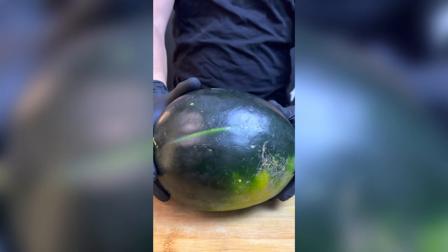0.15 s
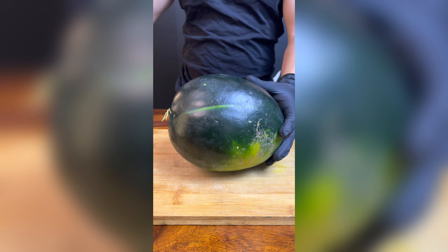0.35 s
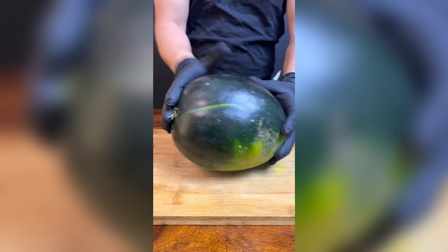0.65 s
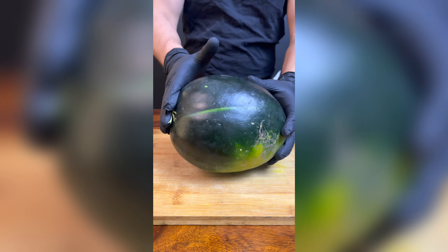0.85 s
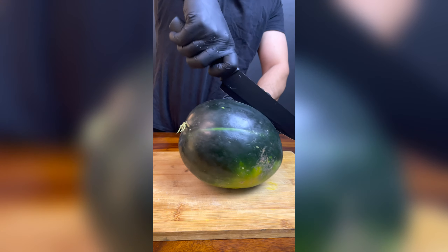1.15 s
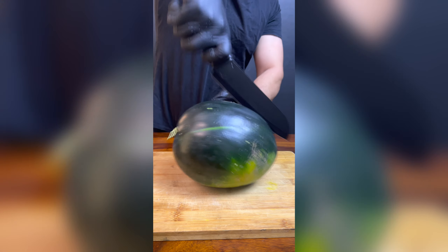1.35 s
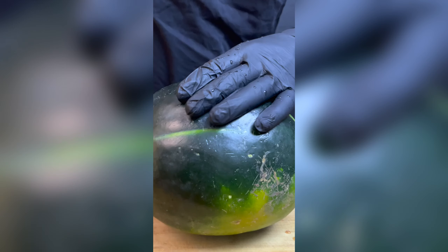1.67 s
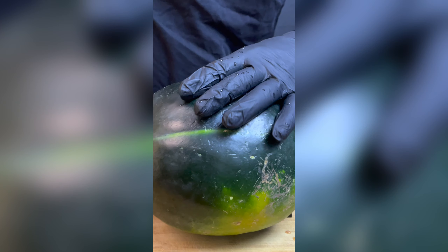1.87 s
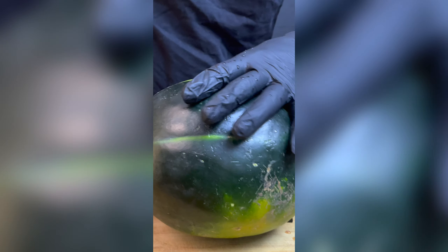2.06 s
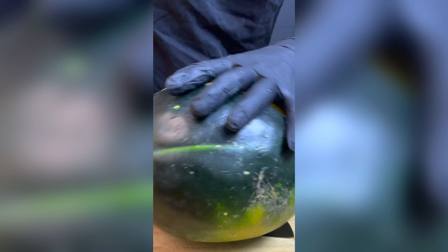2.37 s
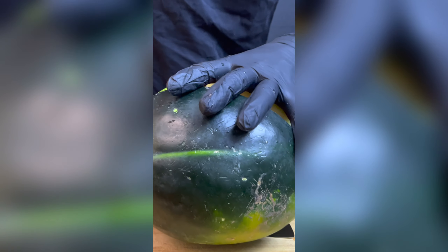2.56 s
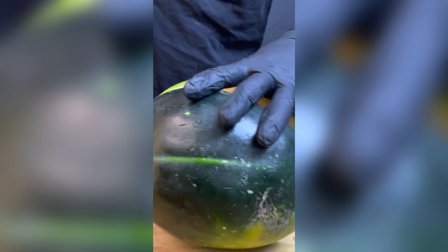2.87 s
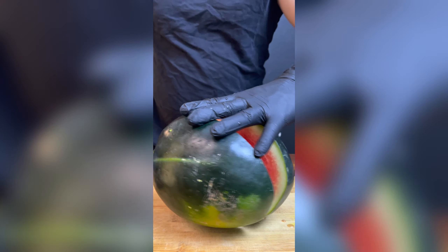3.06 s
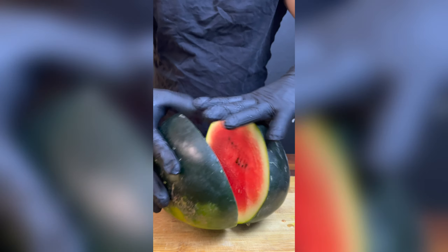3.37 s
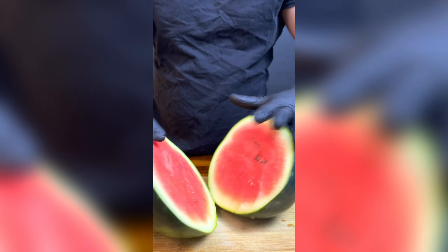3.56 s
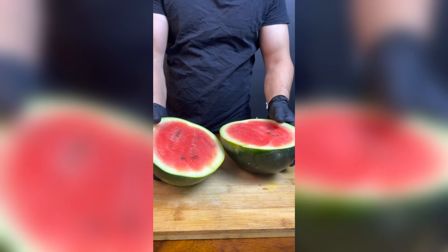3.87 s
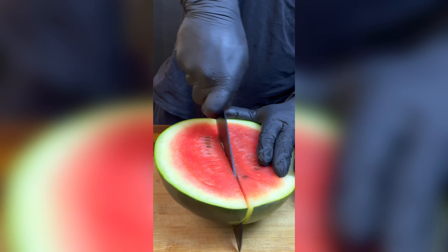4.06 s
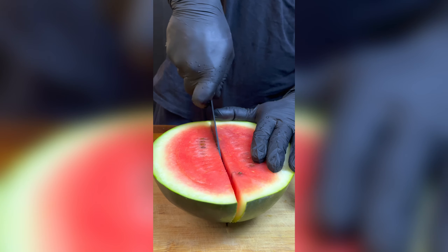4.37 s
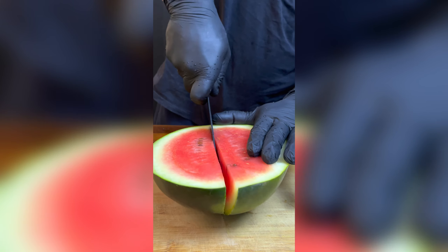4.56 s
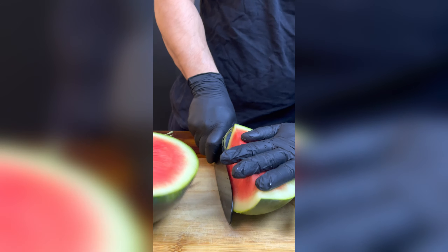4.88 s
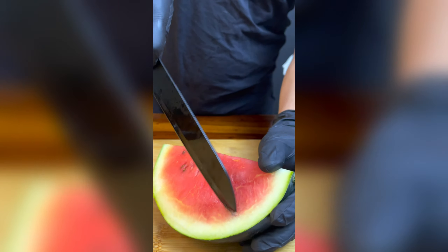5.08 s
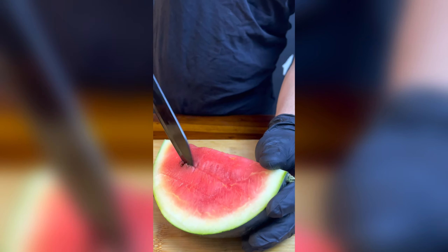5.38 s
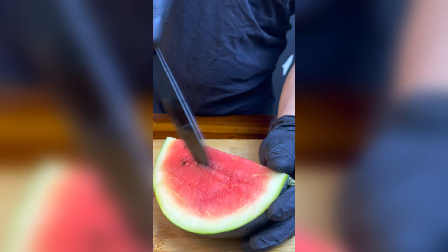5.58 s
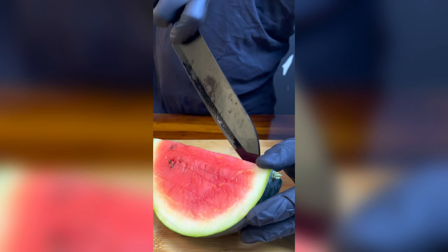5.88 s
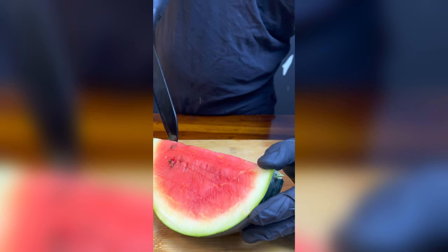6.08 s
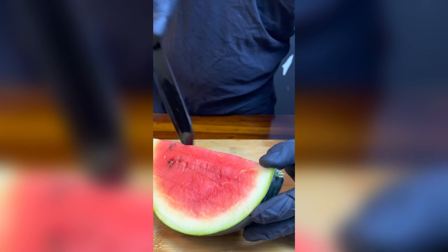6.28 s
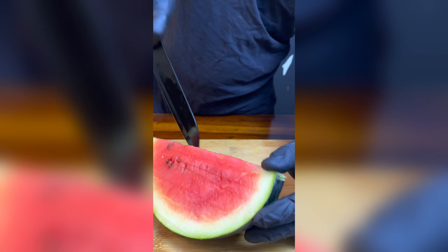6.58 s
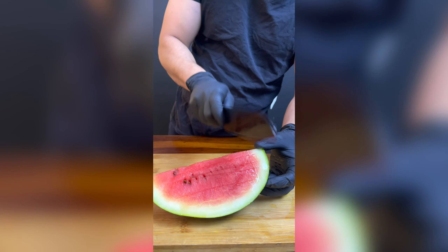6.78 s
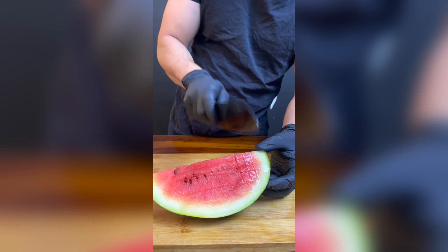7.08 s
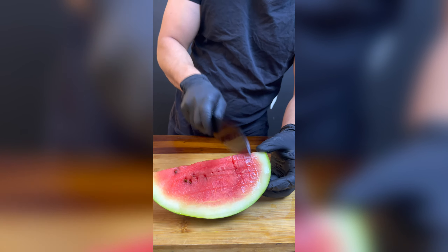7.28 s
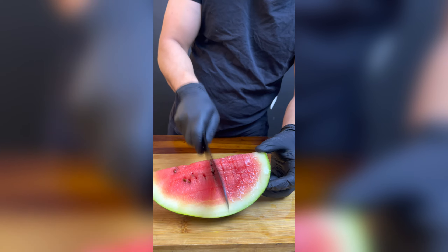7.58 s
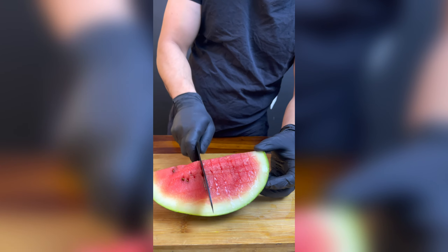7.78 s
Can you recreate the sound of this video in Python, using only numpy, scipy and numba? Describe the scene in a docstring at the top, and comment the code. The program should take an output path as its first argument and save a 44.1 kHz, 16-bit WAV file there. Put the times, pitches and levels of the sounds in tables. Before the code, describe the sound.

In a quiet kitchen, very close, a gloved palm slaps a watermelon: a loud, hollow, booming smack. A knife bites in with scraping creaks and board thuds, then the rind splits with a sharp crunchy crack. Wet squelches and creaking tears follow as it is quartered, ending in soft, evenly spaced juicy slices. Abrupt splices chop the tails.

```python
"""Over a quiet kitchen murmur and a faint creak, a gloved hand slaps a watermelon on a wooden board, close to a phone.
Then a knife splits and slices it: flesh is grains of noise through wet resonances, rind is slips and snaps
through gliding ones, the slap and sharp snaps are cracks that ring the fruit's modes,
and the board thuds on the counter as swelling, decaying sines. Some of it returns from the room.
The action is spliced from short shots: each splice chops the tails and fades in again."""
import sys
import numpy as np
from scipy import signal
from scipy.fft import rfft, irfft, next_fast_len
from scipy.io import wavfile
from scipy.ndimage import uniform_filter1d
from numba import njit

SR = 44100
rng = np.random.default_rng(int(sys.argv[2]) if len(sys.argv) > 2 else 0)


def wav_out(sig):
    """Save sig, one row per channel (or a flat mono array), as 16-bit PCM at SR to the path in sys.argv[1]."""
    wavfile.write(sys.argv[1], SR, np.round(np.clip(np.atleast_2d(sig).T, -1, 1) * 32767).astype(np.int16))


N = 350154
T = np.arange(N) / SR
HALF_SECOND = T[:SR // 2]


def undb(db):
    """Decibels to gain."""
    return 10 ** (np.asarray(db) / 20)


def unit(x):
    """Scale to rms 1."""
    return x / np.sqrt(np.mean(x ** 2))


def band(x, hz, width):
    """Resonance with gain 1 at the centre."""
    return signal.lfilter(*signal.iirpeak(hz, hz / width, SR), x)


def colour(x, peaks):
    """Noise or clicks through a set of steep resonances, rms 1."""
    total = 0
    for k, (hz, width, db) in enumerate(peaks):
        once = band(x, hz, 1.5 * width)
        twice = band(once, hz, 1.5 * width)  # the second pass narrows the peak to about its listed width
        total = total + undb(db) * (-1) ** k * twice  # signs alternate
    return unit(total)


@njit
def sweep(x, hz, width):
    """State-variable band-pass whose centre moves."""
    y, b, l = np.empty(len(x)), 0., 0.
    for i in range(len(x)):
        g, k = np.tan(np.pi * hz[i] / SR), width / hz[i]
        v = (b + g * (x[i] - l)) / (1 + g * (g + k))
        b, l, y[i] = 2 * v - b, l + 2 * g * v, k * v
    return y


def steep(x, hz, width):
    """A moving resonance applied twice, rms 1; the width is that of a single pass."""
    once = sweep(x, hz, 1. * width)
    return unit(sweep(once, hz, 1. * width))


def shaped(points, x):
    """A signal given a spectrum, rms 1."""
    hz, db = np.transpose(points)
    size = next_fast_len(len(x))
    bins = np.maximum(np.fft.rfftfreq(size, 1 / SR), 1)
    gain = undb(np.interp(np.log(bins), np.log(hz), db))
    return unit(irfft(rfft(x, size) * gain, size)[:len(x)])


def grains(per_s, spread_db):
    """Random clicks whose sizes have a long tail, rms 1."""
    hit = rng.random(N) < per_s / SR
    tail = np.exp(spread_db * np.log(10) / 20 * rng.exponential(size=N))
    return unit(hit * rng.standard_normal(N) * tail)


def flicker(per_s, db):
    """Quick random unevenness of a level; db is its spread before smoothing."""
    k = int(SR / per_s)
    steps = np.repeat(rng.standard_normal(N // k + 1), k)
    return undb(db * uniform_filter1d(steps, k)[:N])


def swell(rise, t60):
    """Half a second: a smooth rise to 1, reached two rise times in, then an exponential fall."""
    t = HALF_SECOND - 2 * rise
    return np.where(t < 0, np.exp(-(t / rise) ** 2), undb(-60 * t / t60))


# splices between shots: (time [s], level dip [dB])
SPLICES = [(1.686, -6), (2.652, -3), (2.953, -7), (3.667, -5), (4.019, -15), (4.618, -4), (5.053, -17),
           (5.252, -14), (5.451, -10), (5.919, -18), (6.151, -16), (6.417, -17), (6.802, -15), (6.919, -14),
           (7.117, -22), (7.268, -21), (7.419, -17), (7.57, -9), (7.717, -10)]


def add(out, s, sound):
    """Mix a sound in at a time, chopped at the next splice."""
    next_cut = min([cut for cut, _ in SPLICES if cut > s] + [N / SR])
    start, end = int(s * SR), int(next_cut * SR)
    out[..., start:end][..., :sound.shape[-1]] += sound[..., :end - start]


RISE_CURVE, FALL_CURVE = 1.1, 1.05  # 1 = straight in dB, more = rounder top


def envelope(s, db, rise, hold, fall):
    """Gain that rises, holds and falls, inside its own shot only; rise and fall are times for 20 dB."""
    cuts = np.array([0] + [cut for cut, _ in SPLICES] + [N / SR])
    span = slice(int(cuts[cuts <= s][-1] * SR), int(cuts[cuts > s][0] * SR))
    t = T[span] - s
    before = (np.maximum(-t, 0) / rise) ** RISE_CURVE
    after = (np.maximum(t - hold, 0) / fall) ** FALL_CURVE
    return span, undb(db - 20 * (before + after))


def played(events):
    """Envelopes of many events, their powers added."""
    power = np.zeros(N)
    for event in events:
        span, gain = envelope(*event)
        power[span] += gain ** 2
    return np.sqrt(power)


# murmur of the kitchen: (frequency [Hz], relative spectrum level [dB per Hz])
KITCHEN = [(59, -21), (100, -13.5), (156, -9.5), (349, -6), (404, -6.5), (489, -5), (544, -7), (605, -8),
           (1070, -14), (1600, -20), (6480, -30), (13900, -30), (15800, -41)]
KITCHEN_DB = -46


def kitchen():
    """Steady noise with the room's own spectrum, its level slightly uneven."""
    return undb(KITCHEN_DB) * flicker(21, .6) * shaped(KITCHEN, rng.standard_normal(N))


# rind tearing under the blade: (time at full strength [s], deep creak level [dB], crisp crackle level [dB],
# resonance of the open crack [Hz], pitch of the creak [Hz], rise by 20 dB [s], hold [s], fall by 20 dB [s])
TEARS = [(0.002, -34, -34, 1160, 293, .01, .002, .08), (1.13, -24, -29, 1170, 410, .05, .035, .022),
         (1.274, -37, -37, 1050, 330, .07, .002, .1), (1.446, -33, -39, 1090, 473, .05, .01, .05),
         (1.49, -24, -32, 1260, 390, .06, .055, .04), (1.617, -28, -34, 970, 398, .02, .04, .05),
         (1.75, -39, -49, 1100, 400, .05, .12, .1), (2.226, -44, -45, 1430, 369, .03, .002, .06),
         (2.361, -3, 0, 1250, 316, .008, .008, .045), (2.405, -18, -14.5, 1230, 345, .02, .03, .145),
         (2.5, -24, -21, 1120, 370, .05, .012, .05), (2.655, -19, -17, 1500, 418, .005, .012, .06),
         (2.69, -29, -25, 1520, 480, .03, .1, .04), (3.05, -44, -49, 1200, 400, .15, .22, .2),
         (3.47, -46, -51, 1100, 400, .2, .15, .1), (3.75, -46, -53, 1100, 400, .1, .25, .1),
         (4.087, -13.5, -42, 1130, 296, .022, .012, .05), (4.126, -11, -19, 1150, 330, .03, .09, .17),
         (4.3, -21.5, -35, 1000, 350, .1, .06, .15), (4.466, -12, -18, 1070, 345, .06, .012, .08),
         (4.5, -26, -27, 1060, 320, .05, .04, .05), (4.768, -28, -17, 1300, 413, .04, .002, .06),
         (4.82, -24, -18.5, 1310, 351, .05, .002, .035), (4.89, -24, -36, 1130, 337, .035, .002, .045)]
# body of the creak: (frequency [Hz], width [Hz], level [dB])
CREAK = [(256, 132, -1.5), (403.5, 144, -3), (593, 180, -3.5), (2630, 210, -22)]
# resonances of the skin, heard in crackle and crunch: (frequency [Hz], width [Hz], level [dB])
SKIN = [(800, 340, 1), (1050, 290, 1.5), (1574, 640, -7), (1944, 790, -11)]
CREAK_WIDTH_HZ, CRACK_WIDTH_HZ = 177, 464  # of each filter pass
CRACKLE_LINGERS = 1.15  # its fall, as a multiple of the creak's


def rind():
    """Dense slips of the blade creak in the damped fruit; snapping fibres ring the skin and the hollow of the crack."""
    s, creak_db, crackle_db, crack_hz, creak_hz, rise, hold, fall = np.transpose(TEARS)
    # both pitches glide from tear to tear
    crack_hz, creak_hz = np.interp(T, s, crack_hz), np.interp(T, s, creak_hz)
    slips = grains(1200, 1.47)
    gliding_creak = undb(-2) * steep(slips, creak_hz, CREAK_WIDTH_HZ)
    creak = flicker(60, 1.64) * (gliding_creak + undb(-5) * colour(slips, CREAK))
    snaps = grains(4000, 1.1) + .2 * slips
    hollow = undb(-2) * steep(snaps, crack_hz, CRACK_WIDTH_HZ)
    crackle = flicker(70, 1.3) * (hollow + undb(-7) * colour(snaps, SKIN))
    creak = creak * played(zip(s, creak_db, rise, hold, fall))
    crackle = crackle * played(zip(s, crackle_db, rise, hold, CRACKLE_LINGERS * fall))
    return creak + crackle


# weight on the board shakes it:
# (time at full strength [s], level [dB], rise by 20 dB [s], hold [s], fall by 20 dB [s])
PRESSES = [(0.002, -39, .01, .04, .45), (0.66, -33, .2, .01, .12), (1.25, -38, .2, .06, .2),
           (1.5, -33, .12, .13, .08), (1.7, -33, .05, .02, .5), (2.08, -41, .1, .04, .1),
           (2.46, -30, .12, .01, .07), (2.75, -43, .1, .04, .2), (3.0, -43, .1, .55, .3),
           (3.72, -43, .2, .28, .1), (4.235, -21, .06, .02, .04), (4.37, -22, .12, .12, .15),
           (4.87, -13, .07, .01, .1), (5.17, -40, .05, .06, .05), (5.3, -41, .06, .04, .1),
           (5.77, -42, .5, .1, .3), (6.0, -42, .2, .14, .3), (6.25, -37, .1, .1, .1),
           (6.95, -41, .2, .04, .1), (7.21, -40, .05, .05, .1), (7.38, -36, .15, .03, .1)]
# low resonances of the loaded board: (frequency [Hz], width [Hz], level [dB])
BOARD = [(43, 61, -7), (73.4, 11.4, 0.5), (88, 31.5, -4.5)]
REST_DB = -48  # shake that never stops


def board_shake():
    """Weight leaning on the board becomes low, unsteady noise in its resonances."""
    level = (played(PRESSES) + undb(REST_DB)) * flicker(12, 3.1)
    return level * colour(rng.standard_normal(N), BOARD)


# decay of the echo: (frequency [Hz], t60 [s])
ROOM_T60 = [(150, 0.49), (500, 0.47), (2000, 0.33), (6000, 0.36), (14000, 0.16)]


def room(x):
    """Diffuse echo that differs in length with pitch and dies soonest in the top treble, cut short at each splice."""
    t, echo = HALF_SECOND, 0
    hz, t60 = np.transpose(ROOM_T60)
    for f in 100 * 2 ** np.arange(0, 7.4, 1 / 3):  # third octaves
        decay = undb(-60 * t / np.interp(np.log(f), np.log(hz), t60))
        echo = echo + band(rng.standard_normal(len(t)), f, f / 2) * decay
    # silent for the first 6 ms
    echo = echo * (t > .006) / np.linalg.norm(echo)
    shots = np.split(x, [int(s * SR) for s, _ in SPLICES])
    return np.concatenate([signal.fftconvolve(shot, echo)[:len(shot)] for shot in shots])


# strokes of blade and gloves over wet flesh and skin:
# (time at full strength [s], fine hiss level [dB], squelch minus hiss [dB], rustle minus hiss [dB],
# rise by 20 dB [s], hold [s], fall by 20 dB [s])
STROKES = [(0.58, -38, -18, -22, .046, .001, .01), (1.118, -33.5, 4.5, -9, .032, .045, .035),
           (1.25, -46.5, 0, -11, .035, .03, .12), (1.33, -49, -3, -10, .06, .03, .06),
           (1.455, -33.5, 1, -7, .04, .085, .035), (1.468, -37, 7, -4, .03, .012, .05),
           (1.606, -40, 5, -1, .005, .06, .06), (1.697, -45, 0, -3, .005, .015, .02),
           (1.716, -36, -2, -4, .006, .03, .035), (1.77, -46, 0, -8, .05, .1, .2),
           (1.853, -38, -20, -5, .045, .004, .07), (2.06, -57, -8, -8, .05, .05, .1),
           (2.23, -41, 3, -5, .055, .04, .08), (2.327, -26, 1, -9, .008, .012, .02),
           (2.352, -10, -7, -10, .018, .008, .009), (2.385, -25, -3, -8, .01, .095, .01),
           (2.578, -47, -18, -21, .025, .002, .03), (2.654, -65, 31, 0, .004, .04, .06),
           (2.762, -38, 9, 3, .05, .03, .05), (2.817, -21, -7, -11, .045, .002, .07),
           (2.909, -27, -9, -9, .05, .002, .07), (2.96, -40, 1, -5, .01, .01, .15),
           (3.13, -33, -12, -13, .2, .075, .12), (3.26, -46, 0, 0, .05, .02, .06),
           (3.358, -42, -6, -9, .08, .005, .2), (3.518, -34, -7, 0, .11, .002, .06),
           (3.57, -44, -4, -3, .05, .09, .1), (3.766, -36, -7, 1, .1, .025, .06),
           (3.88, -44, -5, -6, .1, .07, .1), (3.99, -31.5, -9, -5, .07, .002, .04),
           (4.136, -32.5, 5, -8, .1, .002, .15), (4.2, -35, 4, -5, .1, .06, .05),
           (4.29, -44, 10, 0, .02, .09, .1), (4.45, -29, 5, -4, .075, .03, .03),
           (4.485, -21, -7, -9, .05, .085, .023), (4.63, -53, -8, -7, .03, .03, .08),
           (4.755, -20, 2, -6, .032, .012, .05), (4.794, -10, -2.5, -10, .04, .02, .01),
           (4.83, -39, 10, 3, .01, .002, .1), (5.045, -47, -6, -9, .15, .005, .05),
           (5.156, -36.5, -8, -25, .04, .002, .04), (5.206, -33, -3, -11, .035, .005, .09),
           (5.366, -37, -5, -13, .04, .045, .05), (5.31, -52, -1, -6, .02, .005, .04),
           (5.602, -36, -2, -12, .035, .06, .048), (5.77, -35, 4, -11, .045, .035, .045),
           (5.85, -46, -6, -12, .03, .005, .06), (5.908, -47, -12, -16, .03, .002, .01),
           (5.96, -46, -10, -14, .04, .04, .05), (6.008, -41, 2, -4, .035, .012, .05),
           (6.045, -41, 5, -6, .035, .012, .035), (6.102, -33, -8, -16, .04, .01, .035),
           (6.17, -48, -12, -15, .01, .03, .04), (6.25, -40, -3, -14, .045, .1, .045),
           (6.27, -45, 5, -4, .04, .03, .06), (6.45, -45, -7, -15, .014, .002, .046),
           (6.53, -41, -8, -12, .05, .07, .04), (6.55, -45, 6, -5, .05, .02, .06),
           (6.755, -32, 1, -8, .012, .004, .026), (6.872, -35.5, -2, -10, .01, .01, .04),
           (7.031, -36, 2.5, -9, .017, .005, .03), (7.198, -37, -1, -6, .014, .014, .04),
           (7.363, -36, 5, -5, .011, .012, .037), (7.479, -38, 5, -4, .016, .012, .037),
           (7.642, -36.5, 3.5, -4, .016, .01, .043), (7.805, -36.5, 7, -3, .018, .01, .028),
           (7.935, -38.5, 6, -12, .011, .003, .04)]
# juice spits from the cut, short bright ticks in the hiss: (time [s], level [dB])
SPITS = [(2.022, -44), (2.379, -11), (2.470, -22), (4.232, -24), (4.259, -22), (4.453, -19), (4.483, -13),
         (4.502, -13), (4.517, -12), (4.534, -10), (4.552, -15), (4.562, -15), (4.978, -45)]
# centre of the squelch, low where the fruit is deep round the blade: (time [s], frequency [Hz])
SQUELCH_PITCH = [(1.13, 2500), (1.6, 2900), (2.3, 3600), (2.66, 2400), (2.8, 3300), (4.1, 1900),
                 (4.25, 2200), (4.5, 2900), (4.79, 3700), (5.7, 2900), (6.3, 2700), (7.0, 2700)]
# fixed body of the squelch: (frequency [Hz], width [Hz], level [dB])
SQUELCH = [(1600, 2740, -2.5), (2810, 1320, 3.5), (3980, 1060, -2)]
# fine hiss: (frequency [Hz], width [Hz], level [dB])
HISS = [(10700, 4150, -2.5), (13800, 2800, 4.5)]
# rustle: (frequency [Hz], width [Hz], level [dB])
RUSTLE = [(5970, 3200, -2), (7930, 3060, -4.5)]
SPIT_RISE_S, SPIT_HOLD_S, SPIT_FALL_S = .002, .003, .008  # rise and fall by 20 dB
SQUELCH_WIDTH_HZ = 2200  # of each filter pass
SQUELCH_LATE = .4  # share of the hold that passes before the squelch is full
CRUNCH_DB = -9  # crunch, before the stroke's squelch level


def flesh():
    """Cells burst at the edge: a dense fine hiss, a coarser, later squelch, a rustle, a low crunch."""
    s, db, squelch_db, rustle_db, rise, hold, fall = np.transpose(STROKES)
    spits = [(at, spit_db, SPIT_RISE_S, SPIT_HOLD_S, SPIT_FALL_S) for at, spit_db in SPITS]
    hiss = colour(grains(20000, 1.0), HISS) * played([*zip(s, db, rise, hold, fall), *spits])
    pitch = np.interp(T, *np.transpose(SQUELCH_PITCH))
    gliding = undb(-4) * steep(grains(3000, 1.2), pitch, SQUELCH_WIDTH_HZ)
    fixed = undb(-2.5) * colour(grains(4000, 0.8), SQUELCH)
    crunch = undb(CRUNCH_DB) * colour(grains(3000, 1.5), SKIN)
    late = SQUELCH_LATE * hold
    squelch_level = played(zip(s + late, db + squelch_db, rise + late, hold - late, fall))
    squelch = (flicker(60, 2.2) * (gliding + fixed) + crunch) * squelch_level
    rustle = colour(grains(12000, 2.4), RUSTLE) * played(zip(s, db + rustle_db, rise, hold, fall))
    return flicker(90, 1.28) * (hiss + squelch + rustle)


# the slap and the sharpest snaps of the rind: (time [s], crack level [dB], ring level [dB], crack t60 [s],
# contact [s], share of ring time left as the fruit is cut [ratio])
BLOWS = [(.587, 5.5, -1, 0.047, 0.00205, 0.98), (2.328, -27.5, -47, 0.036, .001, .5),
         (2.357, -2.5, -8.5, 0.028, .0015, 0.31), (2.653, -40, -21, 0.027, 0.0012, 0.6),
         (2.672, -40, -22, .02, .0008, .2), (2.682, -36, -26, .015, .0007, .2),
         (2.972, -24, -32, 0.08, 0.0011, 0.35), (4.116, -26, -7, 0.025, 0.0012, 0.27),
         (4.144, -28, -8, .025, .001, .27), (4.185, -26, -13, .025, .0008, .22),
         (4.202, -27, -13, .025, .0008, .22), (4.296, -30, -17, .025, .0008, .22),
         (4.235, -25.5, -12, 0.023, 0.00078, 0.22), (4.261, -19, -19, .03, .001, 0.25),
         (4.447, -27, -15, .02, .001, .2), (4.478, -27, -13, .025, .001, .2),
         (4.465, -22, -13, 0.024, 0.0013, .2), (4.812, -22, -13, .02, .0007, .2),
         (4.887, -38, -22, .03, 0.002, .2), (4.979, -40, -48, 0.022, 0.00078, .2)]
# tones of the whole fruit: (frequency [Hz], level [dB], t60 before cutting [s])
FRUIT = [(141, -13, 0.192), (192, -6, 0.11), (238, -12.5, 0.37), (292, -10.5, 0.3), (382, -2.5, 0.24),
         (406, -7, 0.36), (451, -8, 0.45), (555, -9, 0.42), (870, -9.5, .13)]
# spectrum of the crack: (frequency [Hz], level [dB])
CRACK = [(100, -4.5), (250, 9.5), (700, 5.5), (1500, -1), (2500, -1.5), (4000, 1), (8000, -4), (16000, -3)]


def blows():
    """A broad crack and a push that rings the fruit, duller for longer contact; also the bare clicks that the walls return."""
    out, clicks, t = np.zeros(N), np.zeros(N), HALF_SECOND
    click = shaped(CRACK, 1. * (np.arange(512) == 256))
    for s, crack_db, ring_db, t60, contact, share in BLOWS:
        crack = undb(crack_db) * swell(0.00047, t60) * shaped(CRACK, rng.standard_normal(len(t)))
        modes = 0
        for hz, db, ring_s in FRUIT:
            modes = modes + undb(db - 60 * t / (share * ring_s)) * np.sin(2 * np.pi * hz * t)
        push = np.hanning(int(contact * SR))
        ring = undb(ring_db) * signal.fftconvolve(modes, push / push.sum())
        add(out, s + contact, ring)
        add(out, s, crack)
        # each click carries the energy of its crack
        add(clicks, s, click * np.linalg.norm(crack) / np.linalg.norm(click))
    # air shoved ahead of the swinging hand
    add(out, BLOWS[0][0] - .024, -undb(-13.5) * swell(.012, .03))
    return out, clicks


# the board thudding on the counter, its pitch set by the load on it:
# (time [s], level [dB], frequency [Hz], wooden knock minus thud [dB], t60 [s], build [cycles])
THUDS = [(0.594, -1, 64.4, 1, 0.27, .42), (1.145, -13.5, 73.7, -12, 0.2, .6),
         (1.179, -14, 50, -12, 0.12, .42), (1.470, -7, 82, -25, 0.3, 1.1),
         (1.527, -13.5, 72, -24, 0.1, .45), (1.736, -5.5, 75, -13, 0.29, .42),
         (2.237, -24.5, 80, -14, 0.6, .7), (2.367, -8.5, 70.0, 4.5, 0.27, .42),
         (2.768, -24, 68.6, -16, 0.12, .42), (2.809, -26, 61.9, -14, 0.2, .42),
         (2.9592, -15, 85, -10, .15, .42), (2.985, -13, 88, -12, 0.22, .45),
         (3.038, -13.5, 72, -30, 0.19, .7), (3.314, -32, 80.5, -4, 0.2, .42),
         (3.502, -20, 56, -21, 0.27, .5), (3.761, -22, 57.4, -21, 0.53, .5),
         (4.068, -12.5, 79, -11, 0.6, .6), (4.679, -14, 75, -15, 0.2, .7), (4.766, -14, 62, -15, .2, .6),
         (4.81, -5, 89, -21, 0.067, .5), (4.864, 1, 63.8, -14, 0.15, .65),
         (5.022, -18.5, 66.6, -26, 0.26, .42), (5.542, -29, 67, -27, 0.16, .42),
         (5.683, -17.5, 100, 0.5, 0.098, .42), (5.823, -18.5, 60, 0, 0.097, .42),
         (6.084, -17.5, 53.3, -2.5, 0.17, .42), (6.765, -12.5, 61, -33, 0.1, .42),
         (6.894, -19.5, 59.2, -22, 0.12, .42), (7.021, -21.5, 52, -18, 0.2, .42),
         (7.366, -29, 87, -20, 0.2, .42), (7.472, -19, 56, -22, 0.17, .42),
         (7.648, -22, 48, -25, 0.12, .42), (7.809, -26.5, 51.1, -13, 0.15, .42)]
# tones of the knocked wood: (frequency [Hz], level [dB], t60 [s])
KNOCK = [(138, -3.5, 0.065), (181, 1.5, 0.076), (241, -15, .04), (340, -16.5, 0.027)]


def board_thuds():
    """Each thud builds over its first cycles; a harder edge knocks the wood."""
    out, t = np.zeros(N), HALF_SECOND
    edge = np.hanning(int(0.0025 * SR))
    knock = sum(np.sin(2 * np.pi * hz * t) * undb(-60 * t / t60 + db) for hz, db, t60 in KNOCK)
    knock = signal.fftconvolve(knock, edge / edge.sum())
    for s, db, hz, knock_db, t60, build in THUDS:
        thud = undb(db) * swell(build / hz, t60) * np.sin(2 * np.pi * hz * t)
        add(out, s - .5 / hz, thud)  # half a cycle early
        add(out, s, undb(db + knock_db) * knock)
    return out


# the steel blade touched, one row for each tone that rings: (time [s], level [dB], frequency [Hz], t60 [s])
TINGS = [(1.079, -36, 1190, 0.071), (5.591, -45, 2600, 0.2), (5.72, -42, 3200, 0.3),
         (5.72, -43, 1450, 0.23), (6.3, -48, 4430, .2)]
# the blade dragging on the hard skin, which makes both sing:
# (time at full strength [s], level [dB], rise by 20 dB [s], hold [s], fall by 20 dB [s])
SCRAPES = [(1.081, -37, .004, .02, .04), (1.13, -25, .03, .035, .025), (1.44, -32.5, .015, .055, .04),
           (4.76, -20, .004, .01, .03)]
# tones of the singing: (frequency [Hz], width [Hz], level [dB])
SCRAPE = [(490, 70, -2), (1170, 90, 0), (1920, 150, -7), (2680, 220, -8)]


def blade():
    """Short clean rings of the steel, and its rough singing while it drags."""
    out = played(SCRAPES) * colour(grains(600, 2.5), SCRAPE)
    for s, db, hz, t60 in TINGS:
        ting = undb(db) * swell(0.00075, t60) * np.sin(2 * np.pi * hz * HALF_SECOND)
        add(out, s, ting)
    return out


FADE_S = 0.017  # time constant of each fade-in


def scene():
    """Close sounds, their echo and the kitchen, each shot after a splice starting low and fading up."""
    struck, clicks = blows()
    cut = flesh() + rind() + blade()
    echo = room(undb(-8.5) * clicks + undb(-19.5) * struck + undb(-17.5) * cut)
    sound = struck + cut + board_thuds() + board_shake() + echo + kitchen()
    for s, dip_db in SPLICES:
        shot = sound[int(s * SR):][:SR // 10]
        shot *= undb(dip_db * np.exp(-T[:len(shot)] / FADE_S))  # changes the sound in place
    return sound[None]


MIC_HZ, MIC_WIDTH_HZ, MIC_DB = 13800, 580, 5
TOP_HZ = 15880  # nothing much passes above


def record(dry):
    """The microphone port lifts a band of the top octave; peaks clip at full scale before a steep low-pass."""
    lifted = dry + (undb(MIC_DB) - 1) * band(dry, MIC_HZ, MIC_WIDTH_HZ)
    low_pass = signal.ellip(14, .2, 95, TOP_HZ, fs=SR, output="sos")
    return signal.sosfilt(low_pass, np.clip(lifted, -1, 1))


dry = scene()
out = record(dry)
wav_out(out)
```